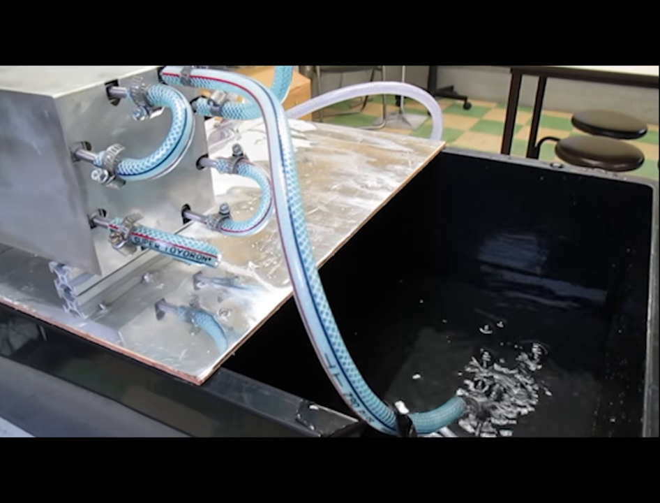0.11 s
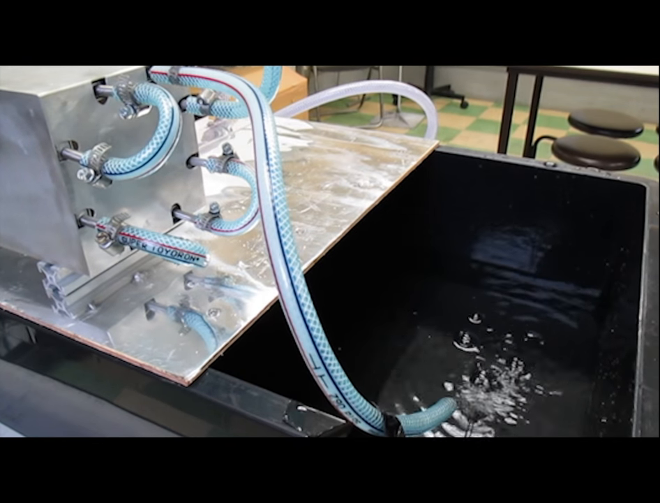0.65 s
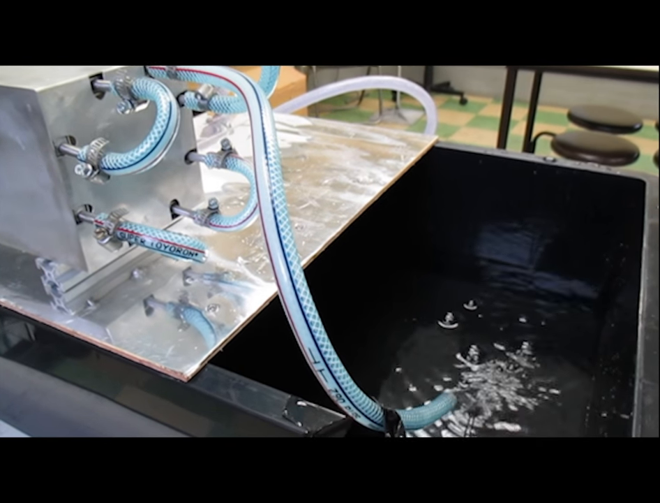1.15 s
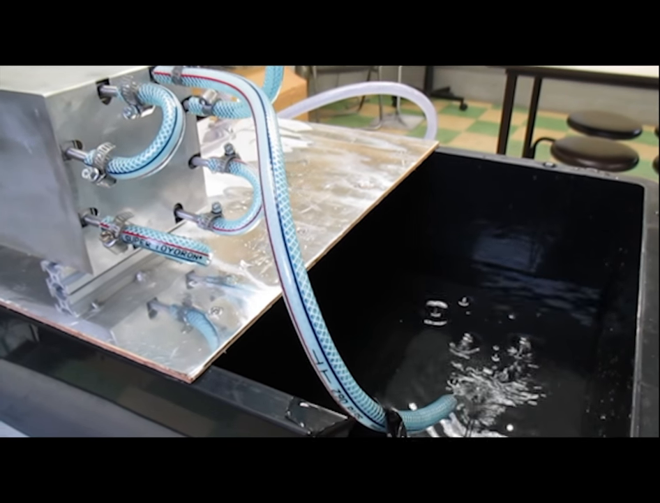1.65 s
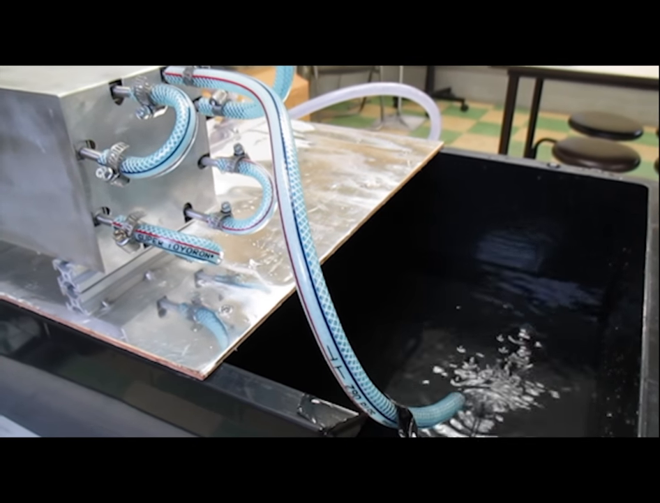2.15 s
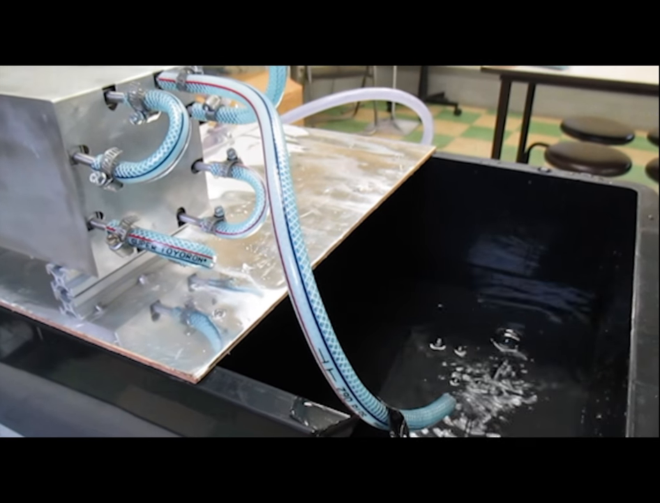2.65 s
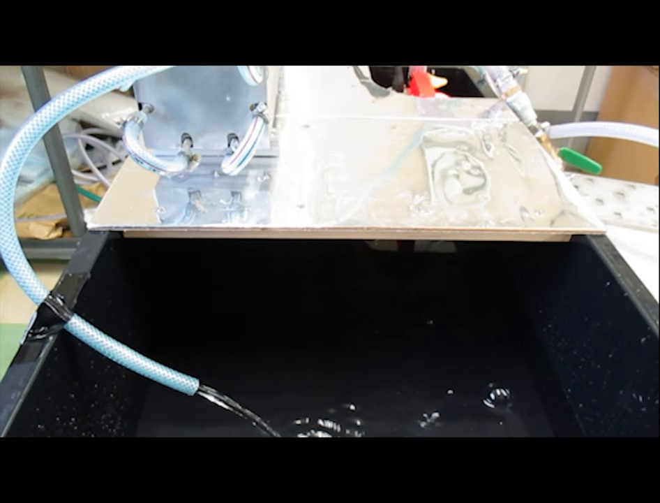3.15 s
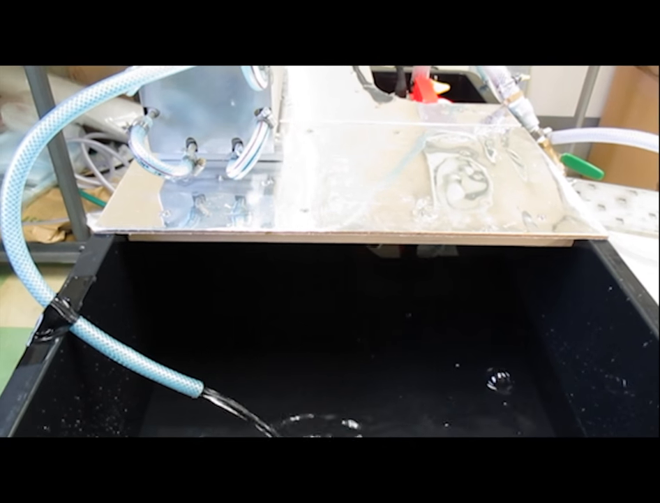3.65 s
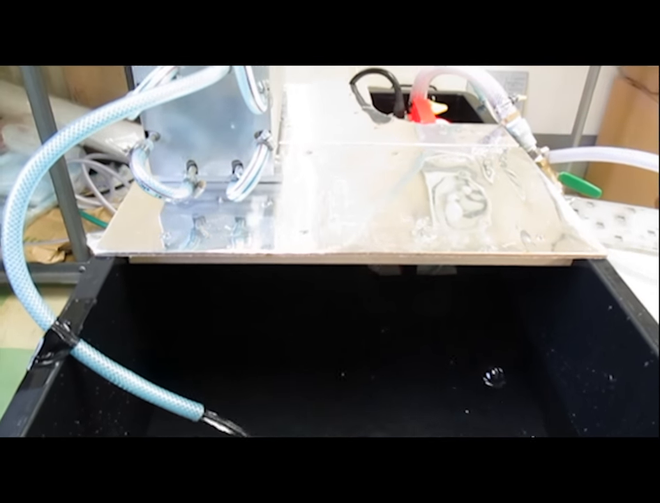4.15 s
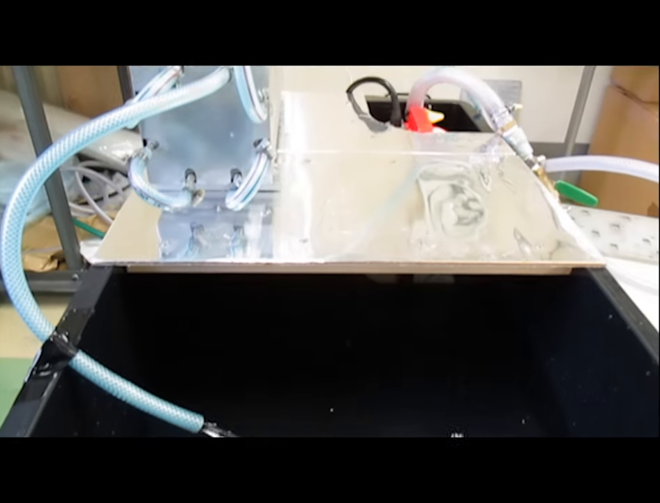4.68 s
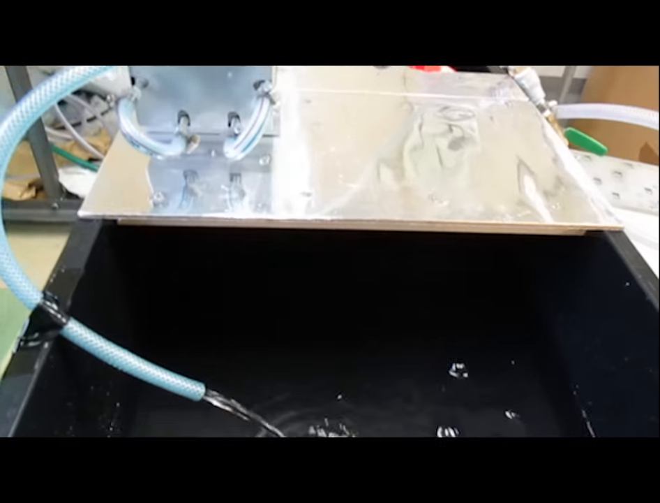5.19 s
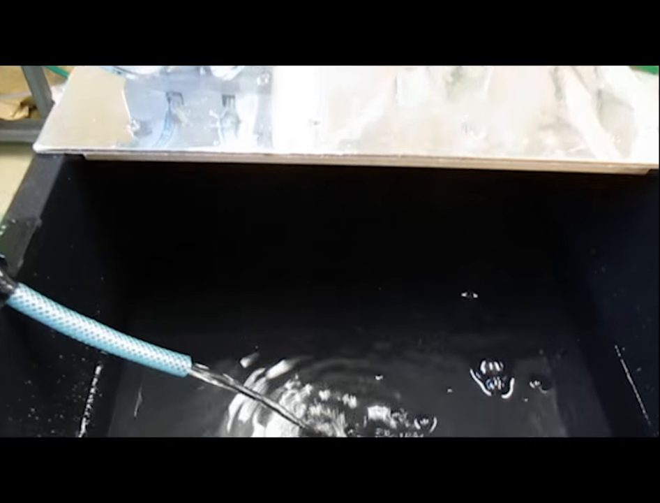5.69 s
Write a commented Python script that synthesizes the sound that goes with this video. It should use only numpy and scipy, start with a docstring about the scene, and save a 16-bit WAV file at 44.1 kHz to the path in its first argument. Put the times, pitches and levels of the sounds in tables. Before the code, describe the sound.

Mono, two views of a hose filling a hard plastic tub in a noisy workshop. Water washes softly with crisp bubble plinks and clicks, over low pump drone, fan hum and room roar. Distant compressed air puffs three times within the first second. At about 2.8 seconds everything cuts to silence briefly, then resumes with a somewhat fuller, less hollow wash and a weaker pump note, starting quieter and swelling.

```python
"""Hose filling a plastic tub in a workshop

Water runs into the tub, heard in mono from two standpoints with a short silence between.
The wash is coloured noise; bubbles and clicks in the tub are damped sines with noise snaps, with echoes.
Pump, fan and mains hum are wavering sines; whines and hall booms are narrow noise with a share of tone.
Low noise makes the roar of the room. Some way off, an air valve vents three times at the first standpoint.
"""
import sys
import numpy as np
from scipy import signal
from scipy.io import wavfile
from scipy.ndimage import uniform_filter1d

SR = 44100
rng = np.random.default_rng(int(sys.argv[2]) if len(sys.argv) > 2 else 0)


def dump_mix(stems):
    """Bounce the given channels to the path in sys.argv[1] as a 16-bit WAV at rate SR."""
    frames = np.atleast_2d(stems).T  # one column per channel
    limited = np.clip(frames, -1, 1)  # hard clip at full scale
    pcm = np.round(limited * 32767).astype(np.int16)
    wavfile.write(sys.argv[1], SR, pcm)


def makeup_ratio(level_db):
    """Linear amplitude ratio for a level in decibels (20 dB per factor of ten)."""
    decades = np.asarray(level_db, float) / 20
    return 10 ** decades


N = 256220

# Standpoints of the microphone: start t/s, end t/s, pump shaft speed/(turns per s)
STANDPOINTS = [(.0238, 2.7905, 28.975), (2.959, 5.81, 29.03)]
# Levels of wash, fizz, machines, booms and roar are given ahead of the creep at the second standpoint.
# Wash of the water, one spectrum per standpoint: f/Hz, density/dB per Hz (relative); then level/dB of each
WASH_COLOURS = [
    [(820, -41), (1400, -1), (1910, -1.5), (2030, -7), (2220, 1), (2290, -2.5), (3230, -10), (6330, -17.5),
     (11000, -24), (15500, -35)],
    [(820, -4.5), (1400, -4), (2030, -3.5), (2220, -4.5), (2290, -3.5), (3160, -10), (3680, -14),
     (8650, -20.5), (11600, -26), (15500, -35.5)],
]
WASH_LEVELS = [-46.5, -44]
# Loudest pops, ahead of the echoes: ringing bubbles, and short clicks at the highest pitches
# t/s, pitch f/Hz, peak level/dB
LOUD_POPS = [(.0425, 6400, -41), (.117, 1500, -41), (.168, 2800, -41), (.1689, 7400, -34.5),
             (.2316, 1160, -34), (.2452, 3560, -43), (.267, 5540, -37.5), (.2884, 9150, -37),
             (.29, 2650, -40), (.346, 1980, -34.5), (.361, 6600, -40), (.386, 1570, -37),
             (.3905, 5460, -35), (.5322, 14070, -40), (.5437, 8580, -41), (.5573, 4120, -43),
             (.654, 1720, -40), (.6628, 3850, -40), (.676, 5860, -42), (.772, 6450, -37),
             (.7725, 9600, -33.5), (.7734, 3750, -33.5), (.8855, 6570, -28), (.9132, 6980, -40),
             (1.2895, 1650, -38), (1.4169, 5600, -40), (1.5084, 3600, -40), (1.534, 2240, -34.5),
             (1.5344, 3690, -41), (1.6518, 10000, -39), (1.8507, 5160, -40), (1.8802, 9400, -40),
             (1.8806, 1100, -29), (1.881, 1030, -33), (1.9676, 13800, -37), (2.0812, 11350, -45),
             (2.0817, 3900, -41), (2.1134, 6800, -34.5), (2.196, 2200, -36), (2.1961, 5630, -37.5),
             (2.2973, 13180, -42), (2.343, 6000, -46), (2.434, 6300, -37.5), (2.4924, 11310, -43),
             (2.554, 6290, -29), (2.567, 8900, -40), (2.6101, 8500, -44), (2.7046, 7400, -40.5),
             (3.0827, 11300, -39.5), (3.0948, 3900, -42), (3.366, 4680, -40), (3.368, 1600, -41),
             (3.47, 6410, -42), (3.4723, 12530, -40), (3.506, 4190, -43), (3.506, 7800, -33),
             (3.5062, 11740, -41), (3.5296, 8100, -47), (3.567, 11400, -35), (3.5697, 4280, -42),
             (3.6408, 10660, -42), (3.74, 4210, -43), (3.804, 8700, -35), (3.8045, 12400, -39),
             (3.8361, 3950, -37), (3.8756, 3130, -42), (4.002, 3280, -39), (4.0846, 3160, -37.5),
             (4.1203, 11330, -40), (4.158, 1720, -40), (4.1788, 13300, -42), (4.1798, 4360, -41),
             (4.3561, 3900, -42), (4.3561, 12760, -37), (4.426, 10540, -39), (4.707, 1750, -37),
             (4.7243, 9680, -38), (4.7531, 11230, -39), (4.828, 9580, -41), (4.8366, 2650, -31.5),
             (4.84, 8450, -33), (4.9161, 4070, -38), (4.9164, 9800, -25), (4.917, 12970, -40),
             (5.083, 9430, -44), (5.183, 3430, -40), (5.2232, 4170, -29.5), (5.4006, 6410, -44),
             (5.443, 8700, -39), (5.4792, 1260, -47), (5.4799, 11100, -38), (5.491, 4100, -40),
             (5.5547, 11220, -41), (5.5688, 10050, -41), (5.5912, 10650, -40), (5.6523, 3200, -39),
             (5.6787, 4300, -38), (5.7673, 10500, -38), (5.7858, 11750, -38)]
# Sharpest snaps of bursting film, ahead of the echoes: t/s, peak level/dB
FILM_SNAPS = [(.1689, -36), (.1809, -45), (.2452, -29.5), (.5322, -32), (.6628, -41), (.795, -42),
              (.8855, -33.5), (1.4169, -41), (1.5344, -33), (1.9676, -38), (2.2973, -35.5), (2.3609, -50),
              (2.557, -40), (2.6305, -44), (3.0942, -46), (3.608, -37), (3.8045, -36), (4.1788, -34),
              (4.3561, -43), (4.8366, -31), (4.9164, -30.5), (4.9264, -38), (5.183, -36), (5.2508, -35),
              (5.6599, -36)]
# Echoes of the tub, then of the hall: level/dB, t60/s
TUB_AND_HALL_ECHOES = [(0, 0.044), (-2.5, 0.48)]
# Pump tones: multiple of the shaft speed, level/dB at first standpoint, level/dB at second
PUMP_TONES = [(6, -27.6, -36.8), (12, -44.3, -50.6), (18, -47.6, -46.5), (30, -49.8, -42.9),
              (33, -56.6, -79.3), (36, -50.1, -63.1), (42, -57.4, -58.4), (48, -58.6, -55.7),
              (54, -71.6, -72.4), (60, -65.2, -69.1), (66, -71.8, -64.8), (82, -67.0, -76.9),
              (87, -68.2, -88.7), (91, -65.9, -70.5), (97, -77.3, -72.7), (100, -70.0, -82.2),
              (103, -70.6, -67.9), (106, -62.5, -60.5)]
# Blade tones of the fan: multiple of FAN_HZ, level/dB at first standpoint, level/dB at second
FAN_TONES = [(1, -37.3, -34.2), (2, -40.7, -45.6), (3, -64.7, -46.0), (4, -83.9, -67.6), (6, -66.7, -64.6)]
# Fuzz of noise around the fan tone: width/Hz, level/dB at first standpoint, level/dB at second
FAN_NOISE = (6, -43.5, -48)
# Magnetic hum of the motors: f/Hz, level/dB at first standpoint, level/dB at second
MAINS_HUM = [(100, -41.9, -35.0), (200, -49.8, -44.2), (300, -36.7, -35.1), (900, -61.1, -60.2),
             (1000, -54.9, -57.3)]
# Whines of other machines: f/Hz, width/Hz, level/dB at first standpoint, level/dB at second
MACHINE_WHINES = [(843.9, 1, -60, -46), (891, 1, -59, -56), (931.4, 1, -58, -56), (991.2, 1, -53.5, -75),
                  (1031.7, 1.5, -46, -52), (1077.3, 1, -63, -61), (1131.5, 1, -57, -75),
                  (1486.1, 1, -62, -72), (1608, 2, -63, -80), (1876.1, 2, -62, -80),
                  (2163.7, 1, -57, -53.5), (2322.6, 1.5, -80, -66)]
# Air valve puffs: t/s, starting level/dB, rise/s, hold/s, t60/s (below the treble)
VALVE_PUFFS = [(0.058, -50.5, 0.043, .03, 1), (0.68, -48.5, 0.025, 0.046, .9),
               (0.976, -37, 0.054, 0.03, 0.83)]
# Colour of the escaping air: f/Hz, density/dB per Hz (relative)
VALVE_COLOUR = [(900, -26), (1500, -2), (2500, -1), (4000, -6), (7000, -6.5), (10000, -8), (13000, -16),
                (15500, -24)]
# Booms of the hall: f/Hz, width/Hz, level/dB at first standpoint, level/dB at second
HALL_BOOMS = [(36.25, 5.7, -36.5, -39), (69.4, 6.7, -41, -38.5), (85.6, 2.6, -45.5, -46),
              (128, 3.5, -40.5, -41.5), (215.2, 5.4, -42, -48.5), (257.3, 30, -60.5, -42.5),
              (561.5, 28, -56, -50.5), (791, 32, -64, -44.5)]
# Roar of the room, one spectrum per standpoint: f/Hz, density/dB per Hz (relative); then level/dB of each
ROAR_COLOURS = [
    [(12, -41), (20, -1.5), (122, -8), (175, -8), (242, -10.5), (301, -8.5), (439, -12), (555, -8.5),
     (665, -17.5), (755, -10.5), (812, -16), (938, -25.5), (1050, -13.5), (1300, -32.5), (1500, -48.5),
     (1950, -61.5), (3300, -120)],
    [(12, -34), (20, -4), (96, 0), (251, -2.5), (290, 1), (335, -7.5), (373, 0), (439, -6.5), (536, -5.5),
     (677, -13), (857, -13), (955, -14), (1140, -15), (1300, -40), (1500, -20.5), (1950, -53), (3300, -120)],
]
ROAR_LEVELS = [-30, -30]
# Where the hall cancels the rumble: f/Hz, width/Hz
HALL_NULLS = [(54, 23), (146, 6.6)]

FAN_HZ = 375.05
# Tiny bubbles left to chance; base level and spread are for a pitch of 4 kHz
FIZZ_PER_S, FIZZ_DB, FIZZ_SPREAD_DB = 600, -65, 3.2
# Fainter pops left to chance, within FAINT_SPREAD_DB either side of FAINT_DB
FAINT_COUNT, FAINT_LOW_HZ, FAINT_HIGH_HZ = 80, 4020, 15000
FAINT_DB, FAINT_SPREAD_DB = -51.5, 4
# Low pops ring for more cycles than high ones: cycles at 4 kHz, power of the pitch
RING_CYCLES, RING_SLOPE = 5, -.3
SNAP_BELOW_POP_DB = -15.5  # every pop snaps faintly as well
# At the second standpoint the level creeps up between these limits, halfway at CREEP_MID_S
CREEP_START_DB, CREEP_END_DB, CREEP_MID_S, CREEP_SPREAD_S = -5, 0.26, 3.67, 0.27

TIME = np.arange(N) / SR
SECOND = TIME > STANDPOINTS[0][1]


def evened(x):
    """Scales to rms 1."""
    return x / np.sqrt(np.mean(abs(x) ** 2) + 1e-20)


def read(points, hz):
    """Reads a spectrum on a log-frequency axis."""
    f, value = np.transpose(points)
    return np.interp(np.log(hz + 1), np.log(f + 1), value)


def drift(fastest_hz):
    """Slow random wandering of rms 1, summed from sines that weaken towards the fastest."""
    t = TIME[::256]
    rates = np.geomspace(fastest_hz / 12, fastest_hz, num=16)
    slow = sum(np.sin(2 * np.pi * (f * t + rng.random())) / np.sqrt(f) for f in rates)
    return np.interp(TIME, t, evened(slow))


def tone(hz, first_db, second_db, waver_db, wander_rad):
    """A sine whose level wavers and whose phase wanders."""
    phase = 2 * np.pi * (np.cumsum(hz * np.ones(N)) / SR + rng.random()) + wander_rad * drift(3)
    level_db = np.where(SECOND, second_db, first_db) + waver_db * drift(4)
    return np.sqrt(2) * makeup_ratio(level_db) * np.sin(phase)


def narrow(hz, width, first_db, second_db, steady):
    """Noise through a very narrow resonance, on top of a steady share of tone."""
    coarse = TIME[::64]  # the slow envelope is made at a 64th of the sample rate
    r = np.exp(-np.pi * width / SR * 64)
    slow = rng.standard_normal((len(coarse) + 3000, 2)) @ [1, 1j]
    slow = signal.lfilter([1], [1, -2 * r, r * r], slow)[-len(coarse):]
    slow = evened(evened(slow) + steady)
    line = np.interp(TIME, coarse, slow) * np.exp(2j * np.pi * (hz * TIME + rng.random()))
    return np.sqrt(2) * makeup_ratio(np.where(SECOND, second_db, first_db)) * line.real


def noise(points, size, patch_db):
    """Random short-time spectra of a given colour, with drifting patches."""
    frames, hz = 4 * N // size + 5, np.fft.rfftfreq(size, 1 / SR)
    a, b, patches = rng.standard_normal((frames, len(hz), 3)).T
    patches = uniform_filter1d(patches, size=12, axis=0)  # across frequency
    patches = evened(uniform_filter1d(patches, size=8, axis=1))  # across time
    z = (a + 1j * b) * makeup_ratio(read(points, hz)[:, None] + patch_db * patches)
    return evened(signal.istft(z, nperseg=size, noverlap=3 * size // 4)[1][:N])


def standpoint_noise(colours, levels_db, size, patch_db):
    """Noise with its own colour and level at each standpoint."""
    first, second = [makeup_ratio(db) * noise(points, size, patch_db) for points, db in zip(colours, levels_db)]
    return np.where(SECOND, second, first)


def wash():
    """The running water as a broad rush of noise."""
    return standpoint_noise(WASH_COLOURS, WASH_LEVELS, size=512, patch_db=1.04)


def damped_ring(hz, ring_s, glide):
    """A damped sine rising in pitch, as of a bubble nearing the surface; it reaches hz after ring_s."""
    t = np.arange(round(6 * ring_s * SR) + 16) / SR
    shape = np.exp(-t / ring_s) * (1 - np.exp(-t / (0.16 * ring_s)))
    cycles = hz * ((1 - glide) * t + glide * t ** 2 / (2 * ring_s))
    return shape / shape.max() * np.sin(2 * np.pi * cycles)


def pop(hz):
    """A ring, or at the highest pitches a click, with a weaker fragment on either side of its pitch."""
    ring_s = RING_CYCLES * (hz / 4000) ** RING_SLOPE / hz
    higher, lower = hz * np.exp(.1 * abs(rng.standard_normal(2)) * [1, -1])
    main = damped_ring(hz, ring_s, .015)
    fragments = damped_ring(higher, ring_s, .015) + damped_ring(lower, ring_s, .015)
    return main + makeup_ratio(-13) * fragments


def film_snap(colour):
    """The short snap of bursting film: a decaying burst of coloured noise, peak 1."""
    burst = rng.standard_normal(40) * np.exp(-np.arange(40) / 16)
    snap = np.convolve(burst, colour)
    return snap / abs(snap).max()


def faint_pops():
    """Chance times, pitches and levels of the fainter pops."""
    when, pitch, size = rng.random((FAINT_COUNT, 3)).T
    times = .03 + when * (TIME[-1] - .03)
    pitches = FAINT_LOW_HZ * (FAINT_HIGH_HZ / FAINT_LOW_HZ) ** pitch
    return list(zip(times, pitches, FAINT_DB + FAINT_SPREAD_DB * (2 * size - 1)))


def pops():
    """Single ringing bubbles and short high clicks, each with a snap, among further snaps of film."""
    out = np.zeros(N + SR)
    events = list(LOUD_POPS) + faint_pops()
    for s, hz, db in events:
        at, sound = round(s * SR), pop(hz)
        out[at:at + len(sound)] += makeup_ratio(db) * sound
    colour = signal.firwin2(41, [0, 2500, 6000, 10000, 13000, 15500, SR / 2],
                            [0, 0.18, 0.99, 0.79, 0.32, 0.0, 0], fs=SR)
    snaps = list(FILM_SNAPS) + [(s, db + SNAP_BELOW_POP_DB) for s, hz, db in events]
    for s, db in snaps:
        at, snap = round(s * SR) - 20, film_snap(colour)  # 20 samples: delay of the colour filter
        out[at:at + len(snap)] += makeup_ratio(db) * snap
    return signal.lfilter(*signal.butter(2, 14000, fs=SR), out[:N])


def fizz():
    """A dense crackle of tiny bubbles; the smallest, highest in pitch, are the faintest."""
    level_db = FIZZ_DB + FIZZ_SPREAD_DB * np.minimum(rng.exponential(1, N), 5)
    size = makeup_ratio(level_db) * (rng.random(N) < FIZZ_PER_S / SR)
    kind = rng.integers(0, 30, N)
    out = np.zeros(N)
    for k, hz in enumerate(np.geomspace(2500, 13000, num=30)):
        ring = damped_ring(hz, rng.uniform(1.5, 3.8) / hz, .03) * (hz / 4000) ** -.5
        out += signal.oaconvolve(size * (kind == k), ring)[:N]
    return out


def tub(x):
    """Dense echoes between the walls of the tub, then a fainter tail from the hall."""
    t = np.arange(SR // 2) / SR
    out = x.copy()
    for db, t60 in TUB_AND_HALL_ECHOES:
        sparse = rng.standard_normal(len(t)) * (rng.random(len(t)) < .15)
        taps = sparse * makeup_ratio(-60 * t / t60) * (t > .0015)
        out += makeup_ratio(db) * signal.oaconvolve(x, taps / np.linalg.norm(taps))[:N]
    return out


def pump():
    """Blade and rotor-slot tones locked to the shaft; high multiples waver more."""
    shaft_hz = np.where(SECOND, STANDPOINTS[1][2], STANDPOINTS[0][2])
    return sum(tone(k * shaft_hz, a, b, 0.1 + 0.004 * k, 0.0017 * k) for k, a, b in PUMP_TONES)


def fan():
    """Blade tones and a fuzz of noise: the speed of the fan wobbles in the draught."""
    blades = sum(tone(k * FAN_HZ, a, b, .6 + .4 * k, .5 * k) for k, a, b in FAN_TONES)
    return blades + narrow(FAN_HZ, *FAN_NOISE, steady=0)


def mains_hum():
    """Nearly steady magnetic hum of the motors, at multiples of 100 Hz."""
    return sum(tone(hz, a, b, 0.78, 0.017) for hz, a, b in MAINS_HUM)


def whines():
    """Thin whines of other machines that hold fairly steady."""
    return sum(narrow(*row, steady=2.5) for row in MACHINE_WHINES)


def valve():
    """Puffs of compressed air some way off; the hall holds the lower part longer than the top."""
    puff = noise(VALVE_COLOUR, size=256, patch_db=0.5)
    middle = signal.sosfiltfilt(signal.butter(2, 9000, fs=SR, output="sos"), puff)
    top = puff - middle
    out = np.zeros(N)
    for s, db, rise, hold, t60 in VALVE_PUFFS:
        t = TIME - s
        fall_db = 60 * np.maximum(t - rise - hold, 0) / t60
        opening = np.clip(t / rise, 0, 1) ** 2
        out += opening * (makeup_ratio(db - fall_db) * middle + makeup_ratio(db - 2.0 * fall_db) * top)
    return out


def booms():
    """Loose booms of the hall: low resonances with only a little steady tone."""
    return sum(narrow(*row, steady=.4) for row in HALL_BOOMS)


def roar():
    """The low roar of the room, notched where the hall cancels it."""
    low = standpoint_noise(ROAR_COLOURS, ROAR_LEVELS, size=4096, patch_db=0.7)
    for hz, width in HALL_NULLS:
        low = signal.lfilter(*signal.iirnotch(hz, hz / width, SR), low)
    return low


def scene():
    """All sources; the creep in level moves everything but the pops and the valve."""
    creep = .5 + .5 * np.tanh((TIME - CREEP_MID_S) / (2 * CREEP_SPREAD_S))
    level = makeup_ratio(SECOND * (CREEP_START_DB + (CREEP_END_DB - CREEP_START_DB) * creep))
    rush = (wash() + roar()) * makeup_ratio(0.6 * drift(8.3))  # wash and roar waver together
    steady = (rush + pump() + fan() + mains_hum() + whines() + booms()) * level
    return (steady + tub(pops() + fizz() * level) + valve())[None]


def top_cut(x):
    """Nothing passes above the cut-off."""
    return signal.sosfilt(signal.butter(12, 15690, fs=SR, output="sos"), x)


def record(dry):
    """Silence before and between the standpoints: a 2 ms fade in, a hard cut out."""
    on = sum(np.clip((TIME - a) / .002 + .5, 0, 1) * (TIME < b) for a, b, _ in STANDPOINTS)
    return top_cut(dry * on)


dry = scene()
out = record(dry)
dump_mix(out)
```